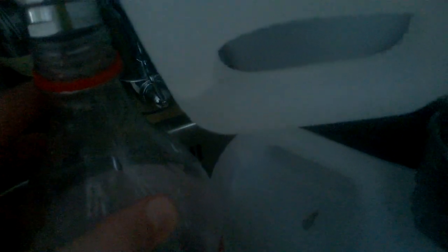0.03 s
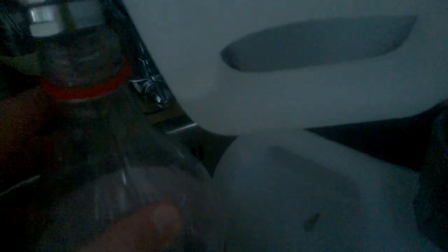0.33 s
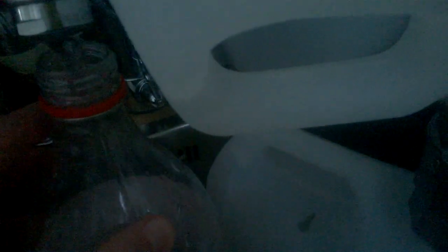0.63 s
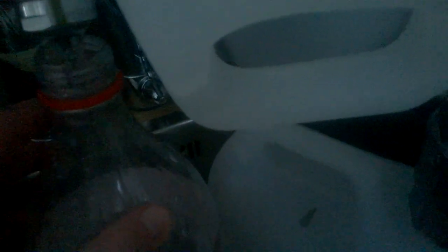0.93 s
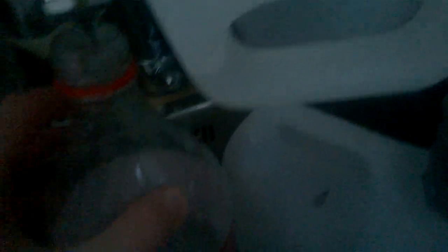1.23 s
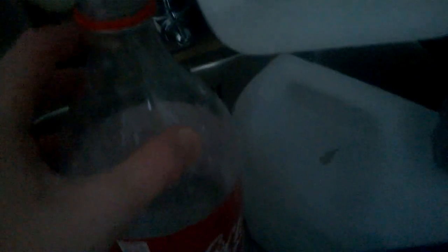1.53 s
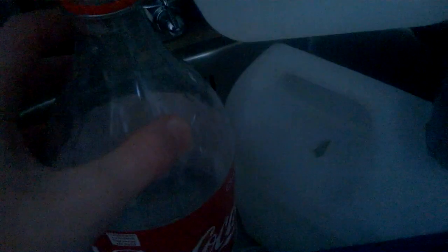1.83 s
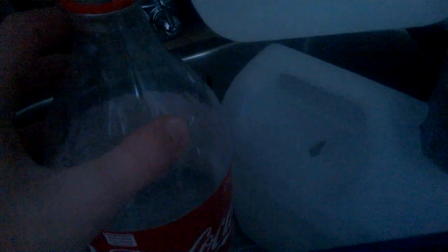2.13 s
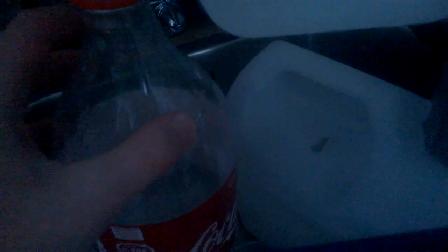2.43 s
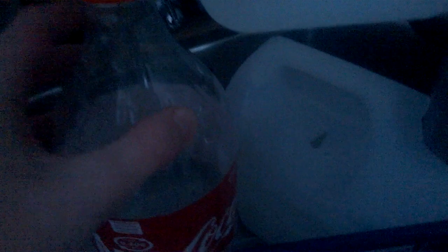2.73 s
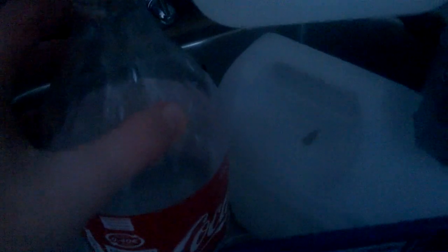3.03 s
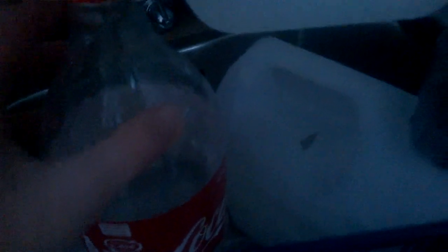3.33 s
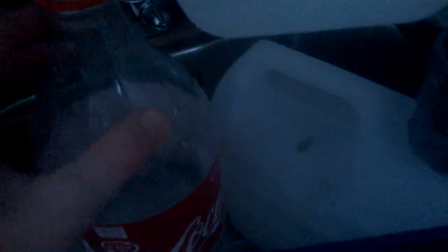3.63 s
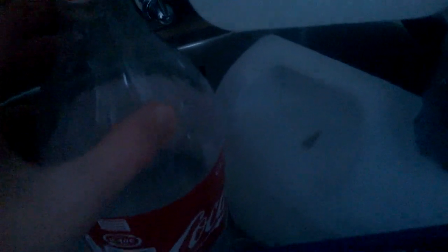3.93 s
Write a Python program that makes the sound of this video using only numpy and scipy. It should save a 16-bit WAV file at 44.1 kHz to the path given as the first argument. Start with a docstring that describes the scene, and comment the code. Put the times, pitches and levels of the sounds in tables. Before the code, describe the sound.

Close, irregular gurgling and popping of bubbles comes from a hand-held plastic bottle in a small room. It eases for a moment and picks up again, with light plastic crinkles, soft handling bumps and a faint hum behind.

```python
"""Liquid bubbles in an open plastic bottle, hand-held among plastic jugs in a small room.
From the start, over mains hum and faint hiss, bubbles burst in uneven clusters and excite the bottle's
air resonances, while the thin wall crinkles and thuds under the fingers. Near 1.4 s the bubbling lulls
and the hand moves up, changing which modes ring most. From about 1.6 s the clusters return;
after 3 s a few tiny bubbles ping, and near 3.8 s the hand gives its strongest thud."""
import sys
import numpy as np
from scipy import signal
from scipy.fft import rfft, irfft
from scipy.io import wavfile

SR = 44100
rng = np.random.default_rng(int(sys.argv[2]) if len(sys.argv) > 2 else 0)


def bounce(signal):
    """Save signal as a 16-bit WAV file at the path given by the first command-line argument."""
    frames = np.transpose(np.atleast_2d(signal))
    limited = np.clip(frames, -1, 1)
    pcm = np.round(limited * 32767).astype(np.int16)
    wavfile.write(sys.argv[1], SR, pcm)


N = 176400
T = np.arange(N) / SR

# Table levels are relative: the functions apply further gains.
# Steady background. Hum: pitch_hz, level_db. Hiss: frequency_hz, level_db
HUM_TONES = [(99, -63.5)]
HISS_SPECTRUM = [(100, 20), (300, 12), (700, 14.5), (1500, 11), (2600, 4), (3600, 1), (4700, 14.5),
                 (6000, 8), (8700, -2.5), (10300, 10), (13000, 3), (15000, 6.5), (16000, 7.5)]
# Rumble of the grip. Envelope: time_s, level_db. Spectrum: frequency_hz, level_db
GRIP_ENVELOPE = [(0, -56), (.7, -64), (1.25, -55), (1.45, -71), (1.7, -55), (2.6, -58), (2.85, -60.5),
                 (3.2, -52), (3.5, -57.5), (4, -56)]
GRIP_SPECTRUM = [(20, -1), (45, 11), (75, 6.5), (115, 14.5), (160, -1.5), (220, -25), (320, -7.5),
                 (500, -35.5)]
# Bumps of the hand: start_s, length_s, centre_hz, level_db
HAND_BUMPS = [(0.122, 0.1, 91, -59), (0.537, 0.064, 225, -51.5), (0.538, 0.062, 62.6, -55),
              (1.056, 0.15, 242, -70), (1.21, 0.038, 84, -61), (1.745, .25, 92, -72),
              (2.416, 0.087, 64.6, -54.5), (3.2, 0.12, 64, -74), (3.696, 0.094, 140, -61),
              (3.77, 0.11, 44.2, -41), (3.814, 0.046, 85, -46)]
# Crinkles of the wall: start_s, level_db, treble_share_db, pitch_hz
WALL_CRINKLES = [(0.014, -47, -8, 4440), (0.0398, -51, -23, 3580), (0.0917, -37.5, -13, 3100),
                 (0.2126, -43.5, -9, 2600), (0.2364, -40, -32, 2880), (0.4776, -40.5, -19, 2680),
                 (0.5948, -48, -16, 5110), (1.078, -56, -32, 2870), (1.5524, -43.5, -20, 3200),
                 (1.5983, -39, -26, 2920), (1.6228, -40.5, -24, 3020), (1.8, -45, -31, 2960),
                 (2.4095, -43.5, -18, 4270), (2.8832, -42.5, -24, 4530), (2.8966, -42, -22, 3280),
                 (3.0247, -45.5, -12, 3200), (3.5503, -50, -26, 2800), (3.6865, -51, -25, 3370)]
# Fingers slipping on plastic: start_s, length_s, level_db
FINGER_SLIPS = [(0.106, 0.016, -65), (0.21, 0.069, -55), (.6, 0.036, -61.5), (1.896, 0.049, -65),
                (2.54, .06, -64), (2.757, 0.052, -64.5), (3.768, 0.042, -66)]
# Noise of crinkles, slips and fizz: frequency_hz, level_db
CRINKLE_SPECTRUM = [(1500, -28), (2300, 26), (3200, 15), (4800, 11.5), (6500, 10.5), (9000, -10.5),
                    (15000, -60)]
SLIP_SPECTRUM = [(3000, -1), (7000, -7.5), (10500, 8), (16000, -4)]
FIZZ_SPECTRUM = [(2500, 8.5), (3600, 1.5), (4700, 4), (6300, -1.5), (8500, -7.5), (15000, -10)]
# Air and wall modes of the bottle: pitch_hz, first_grip_db, second_grip_db, t60_s
BOTTLE_MODES = [(378.2, -5, 4, 0.098), (443.5, 7, -15, 0.22), (504.6, -14, -4, 0.11), (536.6, -2, 5, 0.21),
                (619, -5.5, 3.5, 0.076), (658, 6.5, 0, 0.21), (856, -9, 2, 0.18), (990, -4, -3, 0.042),
                (1065, -2, -7, 0.48), (1542, 2.5, 3, .2), (2016, -11, 7, 0.47), (2576, 9, -26, 0.12)]
# Close reflections off the wall and jugs: delay_s, gain_db
REFLECTIONS = [(.0019, -25.5), (.0036, -23.5), (.0056, -26.5), (.0093, -23.5)]
# Activity of the foam and of the small bubbles: time_s, level_db
FOAM_ENVELOPE = [(0, 14), (.25, 4.5), (.45, 6), (1.4, -2), (1.7, 2), (2.35, 0), (2.9, 2), (4, -4)]
VIGOUR_ENVELOPE = [(0, -4), (.155, -9), (.175, -43), (.205, -21), (.22, 0), (.39, -5), (.45, -20),
                   (.54, -6.5), (.68, -6), (.72, 1), (.81, -1), (.9, -1), (.95, -3.5), (1.02, 6.5),
                   (1.08, -2.5), (1.23, -0.5), (1.36, -4), (1.41, -24.5), (1.59, -16), (1.68, 1),
                   (1.83, -4), (1.88, -10.5), (1.92, 5.5), (2.02, -4), (2.1, -1.5), (2.17, -9), (2.27, 6.5),
                   (2.47, -1), (2.515, -1), (2.56, 4), (2.73, -0.5), (2.79, -3), (3.05, 5), (3.4, -1.5),
                   (3.49, -2), (3.57, 2), (3.72, -4.5), (3.8, 2), (3.92, 3), (4, 2)]
# Strength of froth bubbles and small bubbles by pitch: pitch_hz, level_db
FROTH_SPECTRUM = [(1500, -0.5), (2200, -7), (2600, 1), (2900, -29), (3300, -4)]
SMALL_SPECTRUM = [(330, -8.5), (450, -10), (620, -3), (780, 0), (1000, 3), (1400, 7), (1900, 4), (2300, 11),
                  (2700, -26)]
# Tiny bubbles pinging at the surface: start_s, pitch_hz, level_db
SURFACE_PINGS = [(.8775, 4650, -45.5), (.890, 4950, -50), (.899, 4730, -44), (0.9237, 5400, -50),
                 (.930, 4750, -51), (3.098, 4750, -46), (3.119, 4240, -42.5), (3.542, 4730, -50),
                 (3.553, 5180, -47), (3.671, 4770, -51), (3.686, 4550, -44.5), (3.82, 2850, -41.5)]
# Large bubbles: start_s, pitch_hz, level_db, unscaled_t60_s, splash_db
LARGE_BUBBLES = [(0.0017, 2190, -28, 0.017, -41.5), (0.0137, 1260, -24.5, 0.014, -45),
                 (0.0411, 1410, -37, 0.064, -56), (0.052, 1024, -39, 0.038, -47),
                 (0.079, 1950, -59, 0.028, -38), (0.092, 2090, -24, 0.025, -32.5),
                 (0.1109, 1110, -22.5, 0.021, -45), (0.1305, 1550, -43, 0.044, -42),
                 (0.1494, 1110, -29, 0.013, -36.5), (0.2151, 1023, -34.5, 0.052, -41.5),
                 (0.2513, 1600, -72, 0.053, -36), (0.2681, 1510, -53, 0.035, -38.5),
                 (0.3144, 1122, -27, 0.035, -43), (0.332, 1540, -21, 0.022, -40.5),
                 (0.3691, 477, -38.5, 0.026, -45), (0.3698, 1240, -31, 0.025, -38.5),
                 (0.3887, 1700, -40, 0.06, -49), (0.425, 1886, -41, 0.064, -42.5),
                 (0.4775, 2220, -24, 0.029, -35), (0.4803, 1940, -28, 0.022, -37),
                 (0.5368, 1790, -40, 0.07, -38.5), (0.555, 1770, -31.5, 0.022, -58),
                 (0.6158, 645, -38.5, 0.024, -46), (0.6172, 1710, -36.5, 0.031, -40.5),
                 (0.703, 657, -42.5, 0.053, -39), (0.7215, 643, -36.5, 0.056, -37.5),
                 (0.752, 1484, -36, 0.057, -58), (0.7764, 658, -40.5, 0.08, -47),
                 (0.8375, 1094, -28, 0.041, -41), (0.934, 644, -40, 0.13, -41.5),
                 (0.947, 1690, -37, 0.03, -40), (1.0503, 1550, -36, 0.036, -58),
                 (1.058, 1073, -32, 0.076, -59), (1.066, 632, -31.5, 0.064, -64),
                 (1.0759, 1023, -25.5, 0.064, -31), (1.0886, 610, -20, 0.022, -49),
                 (1.1212, 1600, -28.5, 0.018, -65), (1.1685, 520.0, -31.5, 0.017, -45),
                 (1.2089, 570, -32.5, 0.022, -56), (1.301, 1052, -47, 0.14, -45.5),
                 (1.33, 550, -47, 0.054, -50.5), (1.379, 1400, -45, 0.025, -48.5),
                 (1.552, 2180, -22, 0.017, -33.5), (1.5971, 2403, -36, 0.091, -41),
                 (1.6166, 530, -40, 0.022, -45), (1.622, 2103, -25.5, 0.033, -35.5),
                 (1.6546, 1263, -33.5, 0.038, -68), (1.6683, 606, -41, 0.02, -44.5),
                 (1.6854, 883, -38, 0.097, -34.5), (1.7073, 1940, -29, 0.023, -55),
                 (1.7468, 1143, -22, 0.025, -34), (1.7816, 690, -30.5, 0.022, -45),
                 (1.799, 1096, -44, 0.046, -36.5), (1.801, 466, -42, 0.078, -59),
                 (1.8207, 620, -35.5, 0.02, -45.5), (1.9123, 1460, -39, 0.065, -45.5),
                 (1.9714, 1990, -42, 0.047, -41), (1.9805, 538, -40, 0.079, -47),
                 (2.0535, 560, -41.0, 0.019, -40), (2.0758, 616, -36, 0.032, -56),
                 (2.077, 1380, -34.5, 0.058, -39.5), (2.0979, 990, -31, 0.028, -43),
                 (2.194, 1490, -40, 0.025, -45), (2.2132, 1040, -24.5, 0.013, -57),
                 (2.259, 1013, -32.5, 0.045, -42.5), (2.277, 552, -35, 0.072, -61),
                 (2.3274, 535, -36, 0.03, -54), (2.4067, 970, -41, 0.039, -44),
                 (2.4442, 500, -34.5, 0.024, -54), (2.4659, 510, -39, 0.033, -42.5),
                 (2.5495, 1360, -37, 0.031, -39), (2.5915, 1025, -15.5, 0.01, -40),
                 (2.622, 568, -34, 0.043, -69), (2.6412, 670, -38, 0.019, -48),
                 (2.6879, 550, -39.5, 0.055, -60), (2.7651, 533, -37, 0.056, -42),
                 (2.7749, 643, -39.5, 0.044, -49), (2.7911, 596, -43, 0.044, -41),
                 (2.816, 1490, -52, 0.026, -38.5), (2.8976, 920, -39, 0.065, -37.5),
                 (2.9021, 1920, -37, 0.052, -56), (2.9166, 530, -37.5, 0.03, -62),
                 (2.9358, 1070, -36, 0.033, -49), (2.9525, 1030, -46, 0.043, -42),
                 (2.9964, 1640, -28.5, 0.022, -45), (2.9979, 530, -33.5, 0.047, -50),
                 (3.0196, 560, -38, 0.059, -60), (3.0268, 1495, -38.5, 0.23, -49),
                 (3.0612, 996, -29.5, 0.023, -52), (3.0787, 538, -41, 0.075, -76),
                 (3.1329, 950, -31, 0.028, -52), (3.1759, 1146, -28, 0.032, -41.5),
                 (3.1944, 660, -34, 0.039, -73), (3.221, 1170, -31, 0.022, -40.5),
                 (3.2468, 1540, -34, 0.063, -44.5), (3.2648, 1580, -38, 0.037, -50),
                 (3.3078, 1890, -36.5, 0.037, -45.5), (3.3321, 600, -27, 0.014, -52),
                 (3.3865, 843, -42, 0.074, -50), (3.3876, 1990, -47, 0.098, -35),
                 (3.5341, 1105, -35, 0.052, -46.5), (3.5538, 1556, -37, 0.12, -41.5),
                 (3.5743, 1680, -24.5, 0.026, -44), (3.641, 1010, -34.5, 0.038, -45),
                 (3.6595, 610, -28, 0.028, -45), (3.667, 950, -25, 0.015, -44),
                 (3.686, 990, -25, 0.015, -50), (3.6923, 557, -30, 0.018, -40),
                 (3.7359, 1010, -31.5, 0.037, -73), (3.8843, 992, -40, 0.11, -56),
                 (3.9149, 950, -31.5, 0.055, -39.5)]

HISS_DB, CUTOFF_HZ = -68.5, 15800
ROOM_DB, ROOM_T60_S, ROOM_DELAY_S = -9.5, 0.19, 0.00705
MIC_EDGE_HZ, MIC_LEAK_DB = 2425, -47
REGRIP_SPAN_S = (1.3, 1.55)
CRINKLE_DB, CRINKLE_TREBLE_DB, CRINKLE_RISE_S, CRINKLE_T60_S = -3, 4.5, 0.0027, 0.036
TICK_DB, TICK_T60_S, SLIP_GRAIN_HZ = -4.5, 0.024, 250
FIZZ_DB, FIZZ_STEADY, SNAPS_PER_S, SNAP_SPREAD_DB, SNAP_T60_S = -67.5, 0.28, 150, 2.6, .02
FROTH_DB, PING_DB, PING_T60_S, SPIT_DB = -62, -2.5, 0.021, -10
SMALL_DB, SIMMER_PER_S, SIMMER_SPREAD_DB, SIMMER_T60_CYCLES = -49, 700, 2.2, 14
BUBBLE_DB, RING_SCALE, ATTACK_AT_1KHZ_S = 1.5, 0.68, 0.00083
TWIN_DB, TWIN_MEAN_DELAY_S, TWIN_DETUNE = -6.5, 0.003137, 0.143
GULP_HZ, GULP_T60_S, GULP_DB, GULP_DB_PER_OCTAVE = 385, 0.024, -21, -9
SPLASH_GAIN, SPLASH_T60_S, SPLASH_RISE_AT_1KHZ_S, SPLASH_TOP_HZ = 1.33, 0.047, 0.00057, 2620
GATHER_DB, GATHER_S, STIR_T60_S, CALM_FLOOR = -9, .013, 0.16, 0.94


def from_db(db):
    """Amplitude ratio of a level in decibels."""
    return 10 ** (np.asarray(db) / 20)


def unit_rms(x):
    """Normalisation to unit mean power."""
    return x / np.sqrt(np.mean(x ** 2) + 1e-20)


def envelope(rows):
    """Gain per sample, interpolated in decibels."""
    return from_db(np.interp(T, *np.transpose(rows)))


def gain_at(spectrum, hz):
    """Spectral gain, interpolated over log frequency."""
    frequencies, db = np.transpose(spectrum)
    return from_db(np.interp(np.log(hz + 1), np.log(frequencies), db))


def coloured_noise(spectrum):
    """Spectral shaping of white noise, at unit rms."""
    gains = gain_at(spectrum, np.fft.rfftfreq(N, 1 / SR))
    return unit_rms(irfft(rfft(rng.standard_normal(N)) * gains, N))


def band_noise(samples, low_hz, high_hz):
    """Band-limited noise of unit rms."""
    sos = signal.butter(2, [low_hz, high_hz], "band", fs=SR, output="sos")
    return unit_rms(signal.sosfilt(sos, rng.standard_normal(samples)))


def decay(t, t60):
    """Exponential damping: 60 dB down after t60 seconds."""
    return np.exp(-np.log(1000) * t / t60)


def add(out, start_s, x):
    """Superposition of x onto out from start_s."""
    i = int(np.clip(start_s * SR, 0, N - 1))
    out[i:i + len(x)] += x[:N - i]


def swell(start_s, length_s):
    """Skewed envelope: quick rise, slower fall."""
    progress = np.clip((T - start_s) / length_s, 0, 1)
    return np.sin(np.pi * np.sqrt(progress))


def resonate(x, hz, t60):
    """Forced response of one mode, with unit peak gain."""
    radius = decay(1 / SR, t60)
    feedback = [1, -2 * radius * np.cos(2 * np.pi * hz / SR), radius ** 2]
    return signal.lfilter(np.array([1, 0, -1]) * (1 - radius ** 2) / 2, feedback, x + 1e-18)


def ring(hz, t60):
    """Damped oscillation, rising slightly in pitch; low ones start more abruptly."""
    t = np.arange(int(np.clip(t60, .005, .2) * SR)) / SR
    attack_s = ATTACK_AT_1KHZ_S * np.clip(hz / 1000, .5, 2)
    tone = np.sin(2 * np.pi * hz * (t + t * t / 2))
    return tone * (1 - np.exp(-t / attack_s)) * decay(t, t60)


def hum_and_hiss():
    """Mains hum under slow random amplitude modulation, over broadband noise."""
    hum = sum(from_db(db) * np.sqrt(2) * np.sin(2 * np.pi * hz * T) for hz, db in HUM_TONES)
    waver = 1 + band_noise(N, 0.45, 4.05)
    return hum * waver + from_db(HISS_DB) * coloured_noise(HISS_SPECTRUM)


def room(x):
    """Reverberation: convolution adds a diffuse, decaying tail."""
    t = T[:SR // 2]
    tail = rng.standard_normal(len(t)) * decay(t, ROOM_T60_S) * (t > ROOM_DELAY_S)
    return x + from_db(ROOM_DB) * signal.fftconvolve(x, tail / np.sqrt(np.sum(tail ** 2)))[:N]


def handling():
    """Soft contact excites low frequencies: the grip rumbles and the hand thuds."""
    out = envelope(GRIP_ENVELOPE) * coloured_noise(GRIP_SPECTRUM)
    for start_s, length_s, hz, db in HAND_BUMPS:
        out += from_db(db) * swell(start_s, length_s) * band_noise(N, hz / 1.65, hz * 1.7)
    return out


def plastic_wall():
    """The wall crinkles in snaps with a damped ring; stick-slip friction of fingers adds grainy noise."""
    body, treble, ticks = np.zeros((3, N))
    t = T[:SR // 5]
    snap = (1 - np.exp(-t / CRINKLE_RISE_S)) * decay(t, CRINKLE_T60_S)
    for start_s, db, treble_db, hz in WALL_CRINKLES:
        add(body, start_s, from_db(db + CRINKLE_DB) * snap)
        add(treble, start_s, from_db(db + CRINKLE_DB + treble_db + CRINKLE_TREBLE_DB) * snap)
        add(ticks, start_s, from_db(db + TICK_DB) * ring(hz, TICK_T60_S))
    grain = unit_rms(band_noise(N, 10, SLIP_GRAIN_HZ) ** 2)
    slips = sum(from_db(db) * swell(start_s, length_s) for start_s, length_s, db in FINGER_SLIPS)
    treble += (.5 + .5 * grain) * slips
    return ticks + body * coloured_noise(CRINKLE_SPECTRUM) + treble * coloured_noise(SLIP_SPECTRUM)


def stirring():
    """Relaxation: agitation jumps with each large bubble and settles exponentially."""
    agitation = np.zeros(N)
    for start_s, *_, splash_db in LARGE_BUBBLES:
        add(agitation, start_s, from_db(splash_db) * decay(T[:SR // 2], STIR_T60_S))
    return unit_rms(CALM_FLOOR + unit_rms(agitation))


def fizz():
    """Shot noise: tiny films snap at random over a soft seething of foam."""
    onsets = rng.random(N) < SNAPS_PER_S / SR
    impulses = onsets * from_db(SNAP_SPREAD_DB * np.minimum(rng.exponential(1, N), 4))
    snaps = unit_rms(signal.lfilter([1], [1, -decay(1 / SR, SNAP_T60_S)], impulses + 1e-18))
    activity = envelope(FOAM_ENVELOPE) * np.sqrt(envelope(VIGOUR_ENVELOPE) * stirring())
    return from_db(FIZZ_DB) * activity * (snaps + FIZZ_STEADY) * coloured_noise(FIZZ_SPECTRUM)


def simmer(spectrum):
    """Incoherent sum of little bubbles, random in time and pitch, at unit rms."""
    out = np.zeros(N)
    low_hz, high_hz = spectrum[0][0], spectrum[-1][0]
    draws = rng.random((4000, 4))
    for when, pitch, size, sign in draws[:int(SIMMER_PER_S * N / SR)]:
        hz = low_hz * (high_hz / low_hz) ** pitch
        gain = from_db(SIMMER_SPREAD_DB * min(-np.log(size), 3.5)) * gain_at(spectrum, hz)
        add(out, when * N / SR, np.sign(sign - .5) * gain * ring(hz, SIMMER_T60_CYCLES / hz))
    return unit_rms(out)


def froth():
    """Fine bubbles resonate at high pitch; a few ping clearly, each with a spit of noise."""
    activity = envelope(FOAM_ENVELOPE) * np.sqrt(envelope(VIGOUR_ENVELOPE)) * stirring()
    out = from_db(FROTH_DB) * activity * simmer(FROTH_SPECTRUM)
    for start_s, hz, db in SURFACE_PINGS:
        ping = ring(hz, PING_T60_S)
        spit = band_noise(len(ping), .8 * hz, 1.2 * hz) * decay(T[:len(ping)], PING_T60_S)
        add(out, start_s, from_db(db + PING_DB) * (ping + from_db(SPIT_DB) * spit))
    return out


def muffle(x):
    """Low-pass transmission: little of the bubbling above a steep edge reaches the microphone."""
    lowpass = signal.butter(12, MIC_EDGE_HZ, fs=SR, output="sos")
    return signal.sosfilt(lowpass, x) + from_db(MIC_LEAK_DB) * x


def bottle(x):
    """Sympathetic resonance, its mode gains shifting with the grip, plus echoes off wall and jugs."""
    regrip = np.interp(T, REGRIP_SPAN_S, [0, 1])
    out = x.copy()
    for hz, first_db, second_db, t60 in BOTTLE_MODES:
        out += resonate(x * from_db(first_db + regrip * (second_db - first_db)), hz, t60)
    for delay_s, db in REFLECTIONS:
        add(out, delay_s, from_db(db) * x)
    return out


def small_bubbles():
    """A stream of weak bubbles, amplitude-modulated by the liquid's vigour and stirring."""
    return from_db(SMALL_DB) * envelope(VIGOUR_ENVELOPE) * stirring() * simmer(SMALL_SPECTRUM)


def large_bubbles():
    """Free oscillation: each bubble rings over a splash and a gulp, and sets off a weaker twin nearby."""
    out, t, vigour = np.zeros(N), T[:SR // 10], envelope(VIGOUR_ENVELOPE)
    for start_s, hz, db, unscaled_t60, splash_db in LARGE_BUBBLES:
        spray = band_noise(len(t), min(.64 * hz, .8 * SPLASH_TOP_HZ), SPLASH_TOP_HZ)
        spray *= SPLASH_GAIN * from_db(splash_db)
        t60 = unscaled_t60 * RING_SCALE
        add(out, start_s, from_db(db + BUBBLE_DB) * ring(hz, t60))
        twin = ring(hz * np.exp(TWIN_DETUNE * rng.standard_normal()), t60)
        twin_s = start_s + TWIN_MEAN_DELAY_S * (.5 + rng.random())
        add(out, twin_s, from_db(db + BUBBLE_DB + TWIN_DB) * twin)
        # The liquid closes behind the bubble, more loudly behind a low-pitched one.
        gulp_db = db + GULP_DB + GULP_DB_PER_OCTAVE * np.log2(hz / 600)
        add(out, start_s, from_db(gulp_db) * ring(GULP_HZ, GULP_T60_S))
        # The film bursts; high bubbles splash with a softer onset.
        rise_s = SPLASH_RISE_AT_1KHZ_S * (hz / 1000) ** .51
        add(out, start_s, (1 - np.exp(-t / rise_s)) * decay(t, SPLASH_T60_S) * spray)
        # In lively liquid the splash gathers just before the burst.
        gather = np.linspace(0, min(np.interp(start_s, T, vigour), 1), int(GATHER_S * SR))
        add(out, start_s - GATHER_S, from_db(GATHER_DB) * gather * spray[-len(gather):])
    return out


def scene():
    """Superposition of liquid and plastic in the room with handling, hum and hiss, in mono."""
    liquid = from_db(-1) * muffle(bottle(large_bubbles() + small_bubbles()))
    reverberant = room(liquid + froth() + fizz() + plastic_wall())
    return (reverberant + handling() + hum_and_hiss())[None]


def record(dry):
    """Band limiting: a steep low-pass removes the highest treble."""
    return signal.sosfilt(signal.ellip(10, .1, 70, CUTOFF_HZ, fs=SR, output="sos"), dry)


dry = scene()
out = record(dry)
bounce(out)
```